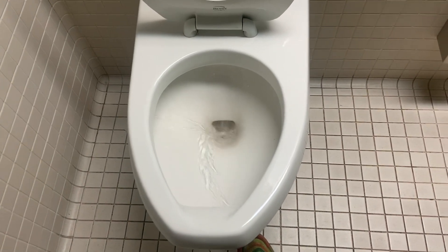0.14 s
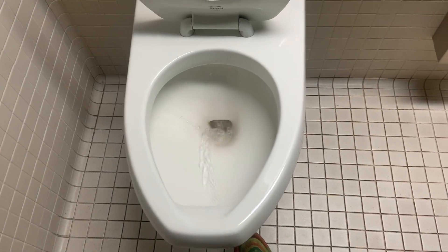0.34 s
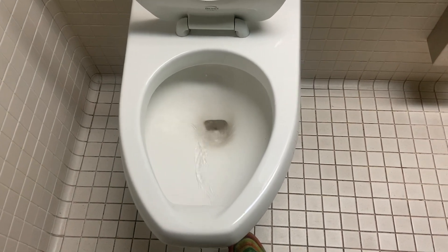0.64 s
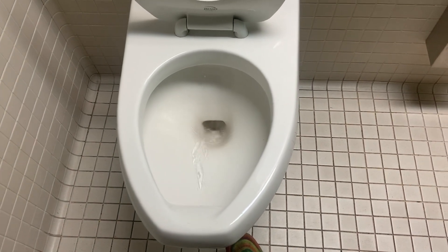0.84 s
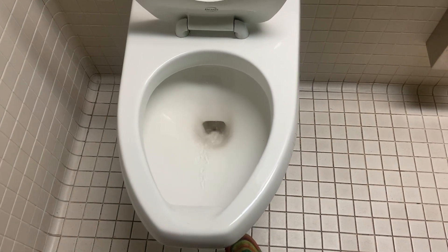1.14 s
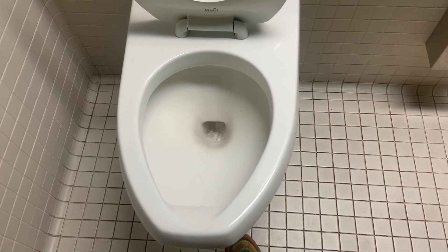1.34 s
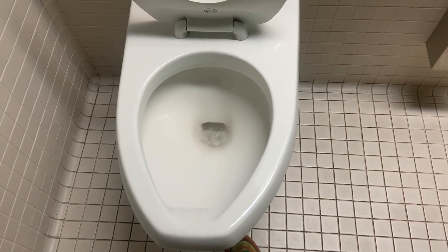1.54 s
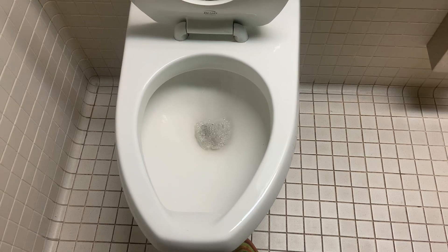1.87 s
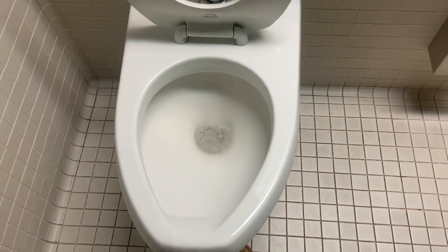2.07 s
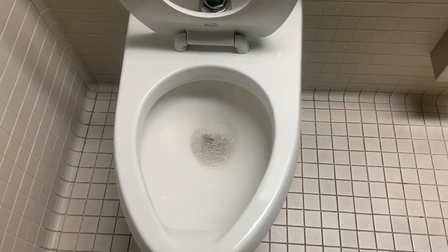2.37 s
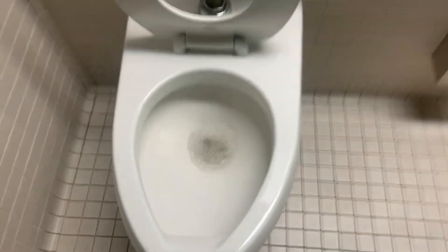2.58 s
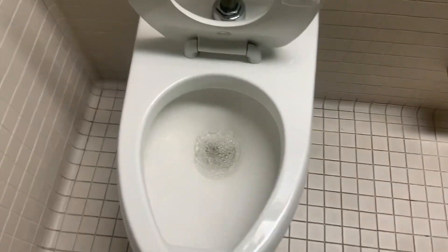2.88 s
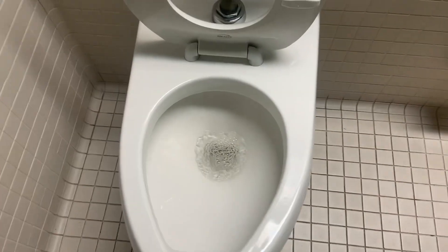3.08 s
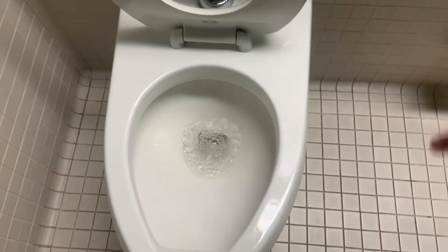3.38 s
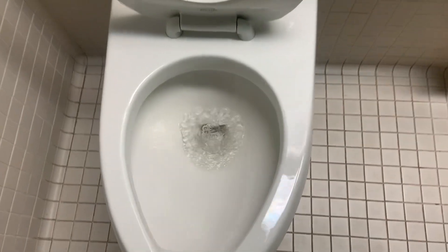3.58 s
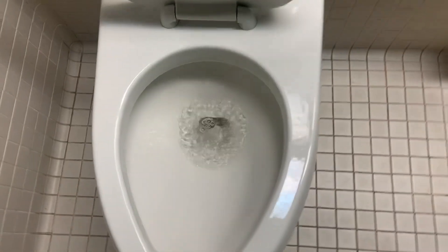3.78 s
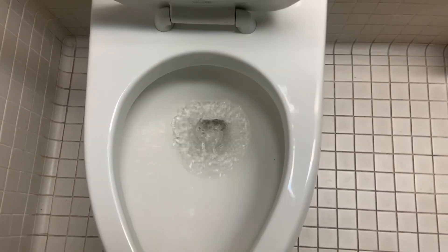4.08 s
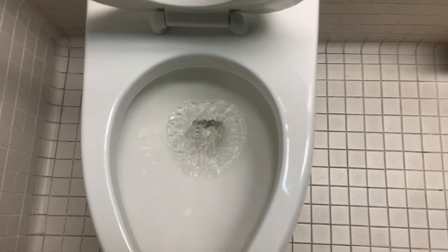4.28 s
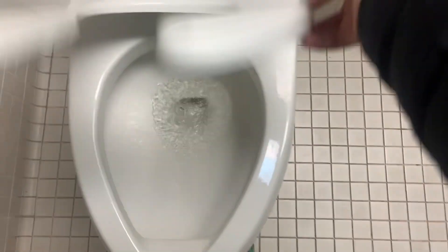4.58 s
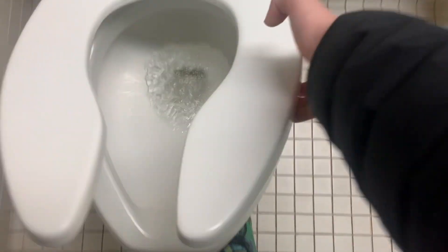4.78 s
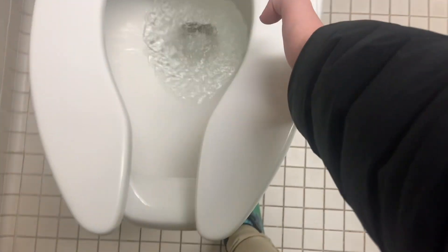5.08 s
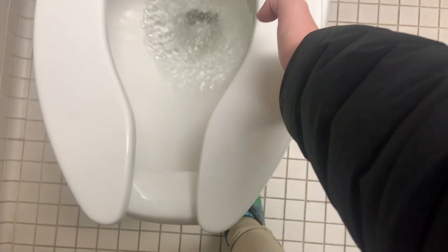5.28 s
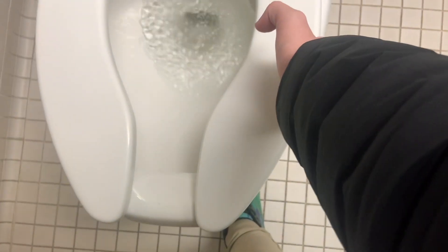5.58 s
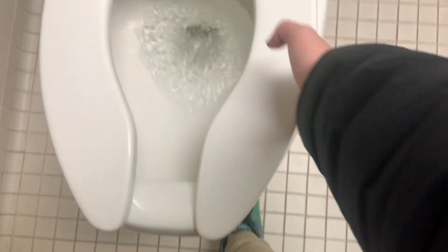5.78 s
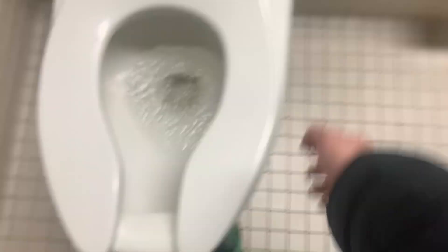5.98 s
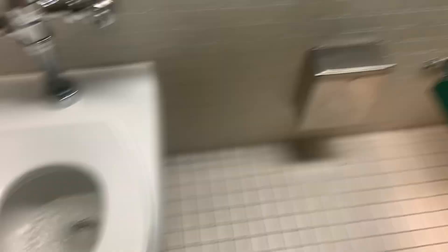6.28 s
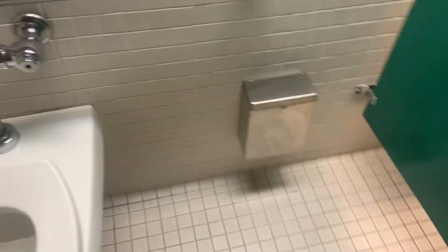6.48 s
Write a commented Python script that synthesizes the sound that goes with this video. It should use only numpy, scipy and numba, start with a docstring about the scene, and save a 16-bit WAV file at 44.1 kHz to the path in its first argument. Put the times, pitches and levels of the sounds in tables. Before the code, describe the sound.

A toilet flush rushes and gurgles in a tiled restroom, cuts off abruptly, then a heavy clattering thump rings out, followed by faint rumble and knocks.

```python
"""Tiled restroom, close to the toilet: noise through bowl resonances rushes and a moving band gurgles
until the flush is cut short. Bursts of noise tick as drips, then a heavy thump sets panel modes ringing.
The level of rumble, hum and faint hiss goes up and down; low thuds and knocks of the seat come
now and then, most of them near the end.
The microphone has two ports a few centimetres apart, out of step above the bass."""
import sys
import numpy as np
from scipy import signal
from scipy.fft import rfft, irfft
from scipy.io import wavfile
from scipy.ndimage import uniform_filter1d, minimum_filter1d
from numba import njit

SR = 44100
rng = np.random.default_rng(int(sys.argv[2]) if len(sys.argv) > 2 else 0)


def digitize_waveform(pressure):
    """Quantize a signal to 16-bit integers and store it at the path in sys.argv[1].

    Rows of a 2-D input are taken as channels; values are limited to [-1, 1].
    """
    field = np.atleast_2d(pressure).T
    bounded = np.clip(field, -1, 1)
    quanta = np.round(bounded * 32767).astype(np.int16)
    wavfile.write(sys.argv[1], SR, quanta)


N = 292383
T, HZ = np.arange(N) / SR, np.fft.rfftfreq(N, 1 / SR) + 1e-3
FLUSH_END_S, FLUSH_CUT_S = 1.368, 0.0032


# the flush as the flow dies: [t/s, spray level/dB, gurgle f/Hz, gurgle level/dB]
FLUSH_COURSE = [(0.0, -23.5, 397, -31.5), (0.16, -22.5, 360, -33.5), (0.28, -23.5, 390, -31),
                (0.4, -24, 403, -33), (0.49, -26.5, 339, -32), (0.56, -26, 360, -33.5),
                (0.63, -28, 302, -36.5), (0.71, -27, 356, -36.5), (0.77, -29, 290, -36.5),
                (0.88, -30.5, 303, -37), (1.0, -32.5, 310, -44), (1.2, -36.5, 320, -54),
                (1.37, -38.5, 347, -42.5)]


def flush():
    """Spray, bubbles and jet over the gurgling trap, slightly louder at the left port; all stop at once."""
    spray_db, gurgle_hz, gurgle_db = curves(FLUSH_COURSE)
    froth = undb(-14.0) * bubbles(rate_hz=220, lo_hz=595.7, hi_hz=7593, cycles=15)
    water = undb(spray_db) * (spray() + froth + jet())
    left_louder = undb([[.6], [-.6]])
    return running() * left_louder * (water + gurgle(gurgle_hz, gurgle_db))


# colour of the spray before the bowl: [f/Hz, relative level/dB per Hz]
SPRAY_COLOUR = [(40, -12.5), (80, 3), (120, 6), (200, 4.5), (600, -3.5), (1200, -10), (2600, 3.5),
                (3800, -4.5), (5500, -7), (8000, 0), (9100, -2.5), (10000, -14), (11000, -8.5),
                (12000, -14.5), (14300, -25), (15500, -41)]
# resonances of the bowl: [f/Hz, width/Hz, relative level/dB]
BOWL_PEAKS = [(720, 23, 6), (1036, 42, 5), (1345, 70, 4), (1708, 50, 2), (2080, 100, -3.5), (3640, 140, 0),
              (4710, 740, 3.5), (6300, 460, 0)]
# how alike the two ports hear the near spray: [f/Hz, shared power/0-1]
ALIKE_SPRAY = [(130, 1), (300, 0.14), (700, 0.7), (1500, 0.3), (2400, 0.65), (3200, 0.7), (4100, 0.4),
               (4900, 0.7), (7900, 0.7), (9000, 1), (12000, 1)]


def spray():
    """Falling water is broad noise, strengthened at the resonances of the bowl."""
    bowl_gain = np.hypot(1, 1.7 * resonances(BOWL_PEAKS))
    colour = undb(over_hz(SPRAY_COLOUR)) * bowl_gain
    return wide_noise(colour, flicker_db=2.0, rate=28, alike=ALIKE_SPRAY, ragged=0.45)


def jet():
    """A narrow jet whistles broadly: a noise band whose pitch and level wander."""
    centre_hz = 4700 * (1 + 0.14 * walk(5.7))
    whistle = moving_band(rng.standard_normal(N), centre_hz, 500.)
    return undb(-20.0 + 3.3 * walk(9.6)) * unit(ports(whistle))


# the trap gulps air and the gurgle changes level: [t/s, level/dB against the gurgle]
AIR_GULPS = [(0.285, 6.5), (0.472, 9), (0.63, 8), (0.77, 6.5), (1.35, -4.5)]
GULP_S = 0.027  # standard deviation of the bell-shaped gulp


def gurgle(hz, level_db):
    """Air in the trap gurgles: noise through two narrow bands that follow the given pitch."""
    gulp_db = sum(db * np.exp(-.5 * ((T - s) / GULP_S) ** 2) for s, db in AIR_GULPS)
    left, own = (moving_band(moving_band(n, hz, 92.0), hz, 95.0) for n in rng.standard_normal((2, N)))
    # the ports hear it unalike, partly in opposite phase
    at_ports = unit(np.array([left, own - 0.12 * left]))
    return undb(level_db + gulp_db + 0.51 * walk(15)) * at_ports


# the panel touches, lands and settles: [t/s, push level/dB, contact/ms]
PANEL_BLOWS = [(2.357, -42, 3.9), (2.373, -34, 2.7), (2.409, -25.5, 0.64), (2.535, -28, 5.4),
               (2.549, -20.5, 4.9), (2.563, -21.5, 3.5), (2.66, -32.5, 4.6)]
# ringing of the panel: [f/Hz, relative level/dB, t60/s]
PANEL_MODES = [(56.4, 2, 0.5), (70.8, 0, 0.31), (110.2, -3.5, 0.32), (147, -11, 0.47), (175.7, -1, 0.33),
               (242, -10.5, 0.32), (290.7, -11, 0.54), (343.6, -7.5, 0.82), (380, -10, 0.62),
               (456, -18, 0.29), (635, -14.5, 0.3), (800, -16.5, 0.25), (1010, -23.5, 0.84),
               (1930, 0, 0.45), (2140, -6, 0.83), (2500, 2.5, 0.7), (2923, -7, 0.28), (3346, -19.5, .3),
               (4900, -34.5, .3), (7000, -13.5, .3)]
# the panel comes to rest on its stop, which chokes the first ringing
CHOKE_S, CHOKE_DB, CHOKE_TAKES_S = 2.517, -9, .012


def thump():
    """Blows ring the panel; loose parts crash along and a thin metal part jangles on."""
    choke = undb(CHOKE_DB * ((T - CHOKE_S) / CHOKE_TAKES_S).clip(0, 1))
    landing = tiles(ring(pushes(PANEL_BLOWS[:3] + chatter()), PANEL_MODES), wet_db=-5) * choke
    settling = tiles(ring(pushes(PANEL_BLOWS[3:]), PANEL_MODES), wet_db=-7)
    dull = signal.butter(6, 8500, fs=SR, output="sos")
    return signal.sosfilt(dull, landing + settling + splash()) + crash() + jangle()


# times, first push level and contact of the chatter
CHATTER_S, CHATTER_DB, CHATTER_MS = 2.421, -14.5, 1.4
BOUNCE_S, BOUNCE_LOSS_DB, BOUNCES = .0175, 6, 6


def chatter():
    """On landing the panel chatters against its stop, weaker at each bounce."""
    return [(CHATTER_S + k * BOUNCE_S, CHATTER_DB - BOUNCE_LOSS_DB * k, CHATTER_MS) for k in range(BOUNCES)]


def since_landing():
    """Seconds since the panel landed, 0 before."""
    return np.clip(T - PANEL_BLOWS[2][0], 0, None)


# colour of the loose parts: [f/Hz, relative level/dB per Hz]
CRASH_COLOUR = [(60, -6), (300, 9.5), (700, -3.5), (1300, -16.5), (2200, -16), (3000, -18.5), (3450, -20.5),
                (4100, -27), (4800, -29), (5800, -37), (7000, -31.5), (8000, -40), (9500, -46.5),
                (12000, -61.5)]
CRASH_S = .085  # decay time constant


def crash():
    """The early blows and the chatter set loose parts crashing: noise that builds in ms and dies away."""
    t = T[:SR]
    swell = (1 - np.exp(-t / 0.0026)) * np.exp(-t / CRASH_S)
    envelope = signal.fftconvolve(pushes(PANEL_BLOWS[:4] + chatter()), swell)[:N]
    noise = wide_noise(undb(over_hz(CRASH_COLOUR)), flicker_db=1.0, rate=32, ragged=0.41)
    return undb(-9) * envelope * noise


# colour of the thin metal, squared where it is played: [f/Hz, width/Hz, level/dB before squaring]
JANGLE_PEAKS = [(1950, 180, -4), (2150, 220, -2), (2480, 300, -3), (2750, 200, -9)]
JANGLE_DB, JANGLE_S = -26.5, .14
CORE_DB, CORE_S = -34, .15


def jangle():
    """Thin metal jangles as narrow noise bands; the middle one outlasts its edges."""
    since = since_landing()
    # it already stirs at the first touch
    stir = undb(-21) * ((T - PANEL_BLOWS[0][0]) / 0.042).clip(0, 1) * np.exp(-since / .02)
    envelope = (1 - np.exp(-since / 0.0046)) * np.exp(-since / JANGLE_S) + stir
    metal = wide_noise(resonances(JANGLE_PEAKS) ** 2, flicker_db=3.5, rate=77, ragged=0.47) * envelope
    core = wide_noise(resonances([(2214, 42, 0)]) ** 2, flicker_db=-0.5, rate=40)
    core = core * (since > 0) * np.exp(-since / CORE_S)
    return undb(JANGLE_DB) * metal + undb(CORE_DB) * core


# colour of the bright burst: [f/Hz, width/Hz, relative level/dB]
SPLASH_PEAKS = [(3460, 460, -2), (4700, 490, -9), (6960, 320, -10.5)]
SPLASH_DB, SPLASH_S = -36, .07


def splash():
    """The landing itself bursts bright and short: noise with a quick rise and exponential decay."""
    since = since_landing()
    envelope = (since / 0.0028).clip(0, 1) * np.exp(-since / SPLASH_S)
    return wide_noise(resonances(SPLASH_PEAKS), flicker_db=0.5, rate=55) * undb(SPLASH_DB) * envelope


# knocks and nudges of the seat: [t/s, push level/dB, contact/ms]
SEAT_KNOCKS = [(2.042, -35, 9.5), (2.193, -47, 2.9), (2.203, -38.5, 7), (4.02, -24, 10), (4.458, -46, 1.5),
               (5.018, -47.5, 1.5), (5.619, -45.5, 0.11), (5.6225, -34.5, 0.29), (5.629, -30, 2.7),
               (5.778, -40.5, 0.34), (5.792, -36, 0.56), (5.812, -30, 5.5), (5.862, -24, 7.4),
               (5.877, -40.5, 8)]
# ringing of the seat: [f/Hz, relative level/dB, t60/s]
SEAT_MODES = [(67.8, -2, 0.045), (253, -6, 0.06), (575, -6, 0.024), (747, -4, 0.04), (1030, -5, 0.05),
              (1372, -2, 0.08), (1630, -5, 0.06), (1930, -6, 0.08), (2310, -1, 0.17), (2730, -4, 0.05),
              (3080, -1, 0.04), (3466, -9, 0.18), (3850, -4, 0.03), (5100, -14, .02), (5970, -16, 0.02)]


def seat():
    """Plastic knocks on porcelain and rings in short modes; it also scuffs."""
    return tiles(ring(pushes(SEAT_KNOCKS), SEAT_MODES), wet_db=-15) + scuff()


# the seat scuffs on the rim: [t/s, length/s, level/dB, fade/dB per s, attack/s]
RIM_SCUFFS = [(5.618, .015, -41, 250, .001), (5.621, .15, -47, 60, .004), (5.772, .095, -46.5, 15, .014)]
SCUFF_RELEASE_DB_PER_S = 800  # added to the fade after the length


def scuff():
    """Rubbing is rough noise, coloured by the seat modes above the lowest, broadened."""
    colour = resonances([(hz, 0.54 * hz, db) for hz, db, _ in SEAT_MODES[1:]]) / np.hypot(1, (HZ / 2300) ** 3)
    rub = np.zeros(N)
    for s, length, db, fade, attack in RIM_SCUFFS:
        since = T - s
        release_db = SCUFF_RELEASE_DB_PER_S * (since - length).clip(0)
        rub += undb(db - fade * since.clip(0) - release_db) * (since / attack).clip(0, 1)
    return rub * wide_noise(colour, flicker_db=3.0, rate=150, ragged=0.24)


# the clearest drips and ticks: [t/s, peak level/dB of the pitched part before the room, f/Hz]
CLEAR_TICKS = [(0.117, -16, 6250), (1.149, -24, 6900), (1.416, -35, 8600), (1.4576, -43, 11400),
               (1.5091, -48.5, 4580), (1.511, -30, 8600), (1.66, -46.5, 4810), (2.3406, -41, 8030),
               (2.745, -57, 5050), (2.807, -49, 5730), (2.676, -45, 5000), (2.854, -42.5, 4630),
               (2.98, -50, 7100), (3.0444, -51, 3920), (3.071, -42, 8000), (3.263, -47.5, 6300),
               (3.4204, -62, 6700), (3.7856, -55, 5330), (3.8707, -53, 4870), (3.9764, -56.5, 4330),
               (4.0057, -59, 4760), (4.2204, -63, 5070), (4.386, -61, 4970), (5.052, -50, 8450)]
TICK_S, TICK_WIDTH = 0.0017, 0.25  # decay time constant; bandwidth as a share of the pitch
TICK_CRACK_DB = -5.5  # broad crack under the pitch
PATTER_PER_S, PATTER_OVER_DB = 6, 6  # loudest patter above the treble level of the background


def ticks():
    """Drips are short bright bursts of noise; fainter random ones patter with the treble level."""
    out, t = np.zeros(N), T[:800]
    treble_db = curves(BACKGROUND_LEVELS)[1]
    draws = rng.random((int(PATTER_PER_S * N / SR), 3)) * [(N - len(t)) / SR, 1, 1]
    patter = [(s, treble_db[int(s * SR)] + PATTER_OVER_DB - 8 * size, 4000 * 2 ** pitch)
              for s, size, pitch in draws]
    for s, db, hz in CLEAR_TICKS + patter:
        burst = rng.standard_normal(len(t)) * np.exp(-t / TICK_S)
        tick = bright(burst, hz, TICK_WIDTH) + undb(TICK_CRACK_DB) * bright(burst, 4500, 2.8)
        out[int(s * SR):][:len(t)] += undb(db) * tick
    return tiles(out + swishes(), wet_db=-8.0)


# soft bright swishes: [t/s, length/s, peak level/dB before the room, f/Hz]
SOFT_SWISHES = [(3.42, .05, -51, 6260), (3.543, 0.13, -52.5, 5400), (4.357, 0.11, -66.5, 4940),
                (4.788, .16, -62.5, 5550)]


def swishes():
    """A swish is a noise band that swells and sinks smoothly."""
    out = np.zeros(N)
    for s, length, db, hz in SOFT_SWISHES:
        swell = np.hanning(int(length * SR))
        band = bright(rng.standard_normal(len(swell)) * swell, hz, width=0.43)
        out[int(s * SR):][:len(swell)] += undb(db) * band
    return out


# lone faint pings: [t/s, f/Hz, level/dB, t60/s]
FAINT_PINGS = [(3.201, 1090, -48, 0.14), (3.383, 1910, -56, 0.14), (3.5, 2510, -47, 0.089),
               (3.65, 2210, -55, 0.08), (3.88, 2120, -57, 0.12), (3.942, 2495, -50, 0.24),
               (3.942, 2440, -52, 0.1), (3.941, 2770, -51, 0.12), (4.0, 2116, -64, 0.28)]
# a small loose part rattles after the thump: [t/s, push level/dB]
RATTLE_HITS = [(2.895, -50), (3.04, -46), (3.06, -48), (3.124, -50), (3.15, -48), (3.199, -48), (3.28, -49),
               (3.312, -45), (3.33, -47), (3.415, -50), (3.52, -53), (3.55, -53), (3.575, -54)]
# ringing of the loose part: [f/Hz, relative level/dB, t60/s]
LOOSE_PART_MODES = [(1300, -9, 0.09), (1600, -3, 0.11), (1800, -10, 0.08), (2750, -8, 0.05)]
RATTLE_MS = 0.36  # contact


def pings_and_rattle():
    """Fading sine pings and a small part ringing at each hit, roughened by a fast level wobble."""
    tones = ring(pushes([(s, db, RATTLE_MS) for s, db in RATTLE_HITS]), LOOSE_PART_MODES)
    t = T[:SR // 2]
    for s, hz, db, t60 in FAINT_PINGS:
        envelope = (t / 0.0052).clip(0, 1) * 1000. ** (-t / t60)
        tones[int(s * SR):][:len(t)] += undb(db) * np.sin(2 * np.pi * hz * t) * envelope
    return tiles(tones * undb(1.05 * walk(96)), wet_db=-16)


# background level as heard, rising and falling: [t/s, bass reference level/dB, treble reference level/dB]
BACKGROUND_LEVELS = [(1.38, -57, -50.5), (1.46, -68.5, -66.5), (1.6, -59.5, -61.5), (1.75, -68, -69),
                     (1.85, -72.5, -77), (2.33, -74.5, -77), (2.75, -41, -53.5), (3.0, -45, -57),
                     (3.42, -49, -59.5), (3.68, -66, -66), (3.82, -58, -63), (4.1, -60, -70),
                     (4.42, -57.5, -69.5), (4.5, -51.5, -69), (4.85, -59.5, -70.5), (5.04, -61, -73.5),
                     (5.12, -68, -79), (5.6, -64.5, -78.5), (5.76, -52, -73), (5.83, -46, -84),
                     (5.89, -56.5, -65.5), (5.96, -65, -64.5), (6.08, -55, -57.5), (6.18, -49, -58),
                     (6.5, -49.5, -60), (6.63, -52, -64.5)]


def background():
    """Draining bowl, hum, drone, rumble, bubbly hiss and a thin top band, at the background levels."""
    bass_db, treble_db = curves(BACKGROUND_LEVELS)
    return drain() + hum(bass_db) + drone(bass_db) + rumble(bass_db) + hiss(treble_db) + sizzle(treble_db)


# the bowl as the last water drains: [f/Hz, width/Hz, relative level/dB]
DRAIN_PEAKS = [(320, 40, -1.5), (600, 80, -4), (990, 43, 2.5), (1380, 78, -5.5), (2000, 260, -17.5)]
DRAIN_DB, DRAIN_FADE_DB_PER_S = -54, 38


def drain():
    """The bowl murmurs after the flush: resonant noise that flickers and fades."""
    fade_db = DRAIN_FADE_DB_PER_S * (T - FLUSH_END_S).clip(0)
    murmur = wide_noise(resonances(DRAIN_PEAKS), flicker_db=7.0, rate=71)
    return murmur * undb(DRAIN_DB - fade_db) * (1 - running())


HUM_HZ, HUM_OVER_DB, HUM_IN_FLUSH_DB = 56.4, 6, -43  # above the bass level; while the water runs


def hum(bass_db):
    """A low sine wavers in pitch and level."""
    gain = undb(bass_db + HUM_OVER_DB) * (1 - running()) + undb(HUM_IN_FLUSH_DB) * running()
    phase = 2 * np.pi * np.cumsum(HUM_HZ + 7.1 * walk(18)) / SR
    return np.sqrt(2) * np.sin(phase) * gain * undb(1.1 * walk(24))


DRONE_HZ, DRONE_START_S, DRONE_END_S = 309.4, 2.75, 4.54
DRONE_OVER_DB, DRONE_FADE_DB_PER_S = -4.5, -4  # above the bass at its start; negative: gains on the bass


def drone(bass_db):
    """A hollow drone: noise through two narrow bands at a wandering pitch, faded out at its end."""
    hz = DRONE_HZ + 12 * walk(10)
    level_db = bass_db + DRONE_OVER_DB - DRONE_FADE_DB_PER_S * (T - DRONE_START_S) + 3.5 * walk(14)
    tone = unit(moving_band(moving_band(rng.standard_normal(N), hz, 31.0), hz, 49.0))
    gate = (T > DRONE_START_S) * ((DRONE_END_S - T) / 0.54).clip(0, 1)
    return tone * undb(level_db) * gate


# low resonances of the room: [f/Hz, width/Hz, relative level/dB]
RUMBLE_PEAKS = [(82, 25, 7.5), (143, 6.6, 10.5), (183, 30, -4), (237, 48, -4), (313, 56, -8),
                (385, 26, -5.5), (500.6, 48, -8.5), (690, 80, -13.5)]


def rumble(bass_db):
    """Noise rumbles in the low room resonances."""
    colour = resonances(RUMBLE_PEAKS) / np.hypot(1, (HZ / 1200) ** 2)
    return wide_noise(colour, flicker_db=2.5, rate=18) * undb(bass_db + 2.0)


# colour of the hiss: [f/Hz, relative level/dB per Hz]
HISS_COLOUR = [(500, 5.5), (1000, 0.5), (1500, -2), (2500, -1), (3500, -3), (5000, -5.5), (7000, -10),
               (7900, -15), (8200, -38.5)]


def hiss(treble_db):
    """Faint broad noise with a trickle of small bubbles in it."""
    noise = wide_noise(undb(over_hz(HISS_COLOUR)) * (HZ > 450), flicker_db=2, rate=25, ragged=0.3)
    trickle = undb(-9.0) * bubbles(rate_hz=100, lo_hz=895, hi_hz=7070, cycles=7.9)
    return undb(treble_db) * (noise + trickle)


# colour of the thin top band: [f/Hz, relative level/dB per Hz]
SIZZLE_TINT = [(7700, -48), (8100, -0.5), (9000, 5), (10000, -10.5), (11500, -13.5), (14000, -18.5),
               (15500, -40)]
# it flares up: [t/s, starting level/dB]
SIZZLE_FLARES = [(1.369, -52), (2.347, -56), (5.931, -74)]
SIZZLE_FLOOR_DB, SIZZLE_OVER_DB, FLARE_FADE_DB_PER_S = -86, -15.5, 44.5  # OVER: above the treble level


def sizzle(treble_db):
    """Top treble noise over a steady floor, with sudden flares that fade."""
    flares = sum(undb(db - FLARE_FADE_DB_PER_S * (T - s).clip(0)) * (T > s) for s, db in SIZZLE_FLARES)
    gain = undb(SIZZLE_FLOOR_DB) + undb(treble_db + SIZZLE_OVER_DB) + flares
    return wide_noise(undb(over_hz(SIZZLE_TINT)), flicker_db=2.5, rate=27) * gain


def running():
    """1 while the water runs, then quickly 0."""
    return np.clip((FLUSH_END_S - T) / FLUSH_CUT_S, 0, 1)


def bubbles(rate_hz, lo_hz, hi_hz, cycles):
    """Bubbles are dense short steady tones of random pitch and size, scaled together to rms 1."""
    out, t = np.zeros(N + 2048), T[:2048]
    for when, pitch, size in rng.random((int(rate_hz * N / SR), 3)):
        hz = lo_hz * (hi_hz / lo_hz) ** pitch
        envelope = hz * t * np.exp(-hz * t / cycles)
        out[int(when * N):][:len(t)] += np.sin(2 * np.pi * hz * t) * envelope * undb(8 * size)
    return unit(ports(out[:N]))


def pushes(table):
    """Raised-cosine pushes, area 1 before their level; a longer contact is duller."""
    force = np.zeros(N)
    for s, db, ms in table:
        push = np.hanning(int(ms * SR / 1000) + 3)
        force[int(s * SR):][:len(push)] += undb(db) * push / push.sum()
    return force


def ring(force, modes):
    """A force sets decaying sine modes ringing: [f/Hz, level/dB, t60/s]."""
    t = T[:SR]
    body = sum(undb(db) * np.sin(2 * np.pi * hz * t) * 1000. ** (-t / t60) for hz, db, t60 in modes)
    return signal.fftconvolve(force, body)[:N]


ROOM_T60_S, ROOM_TREBLE_HZ = 0.55, 3500


def tiles(x, wet_db):
    """Direct sound plus the tail of a hard room, duller as it dies, its own at each port."""
    t, noise = T[:SR], rng.standard_normal((2, SR))
    low = signal.sosfilt(signal.butter(2, ROOM_TREBLE_HZ, fs=SR, output="sos"), noise)
    treble_tail = (noise - low) * 1000. ** (-t / (0.11 * ROOM_T60_S))
    tail = low * 1000. ** (-t / ROOM_T60_S) + treble_tail
    wet = signal.fftconvolve(x[None], tail / np.linalg.norm(tail[0]), axes=1)[:, :N]
    return ports(x) + undb(wet_db) * wet


# how far the left port lags the right: [f/Hz, phase/radians]
PORT_LAG = [(100, 0), (700, .7), (1800, .6), (2400, 2.3), (2900, 3.14), (3400, 3.6), (4100, 4.7),
            (4800, 6.1), (6800, 5.8), (7900, 4.5), (8600, 3.8), (9100, 3.14), (10700, 3.14), (12000, .2),
            (13000, 0)]


def ports(x):
    """One sound at both microphone ports, the left one shifted in phase."""
    return np.array([irfft(rfft(x) * np.exp(-1j * over_hz(PORT_LAG)), N), x])


# how alike the two ports hear the spread-out room: [f/Hz, shared power/0-1]
ALIKE_SPREAD = [(100, 1), (1000, 0.6), (2000, 0.3), (5000, 0.25), (6800, 0.8), (7900, 0.7), (9000, 1),
                (12000, 1)]


def wide_noise(gain, flicker_db, rate, alike=ALIKE_SPREAD, ragged=0.72):
    """Noise in octave bands that flicker alone; partly shared by the ports, partly their own; rms 1."""
    share = np.clip(over_hz(alike), 0, 1)
    both, own = rfft(ports(rng.standard_normal(N))), rfft(rng.standard_normal((2, N)))
    spectrum = gain * ripple(ragged) * (np.sqrt(share) * both + np.sqrt(1 - share) * own)
    octave = np.log2(np.clip(HZ, 125, 8000) / 125)
    bands = (irfft(spectrum * np.clip(1 - abs(octave - k), 0, 1), N) for k in range(7))
    return unit(sum(band * undb(flicker_db * walk(rate)) for band in bands))


RIPPLE_S = 0.0052  # decay time constant of the echoes


def ripple(depth):
    """The many close resonances of a small hard room make a spectrum ragged."""
    echoes = rng.standard_normal(SR // 4) * np.exp(-T[:SR // 4] / RIPPLE_S)
    return unit(abs(rfft(echoes, N)) ** depth)


def bright(burst, hz, width):
    """A burst of noise narrowed twice to a band, peak 1; width is a share of the pitch."""
    for _ in range(2):
        burst = moving_band(burst, np.full(len(burst), 1. * hz), width * hz)
    return burst / abs(burst).max()


@njit
def moving_band(x, hz, width):
    """State-variable band-pass whose centre can move every sample."""
    y, band, low = np.empty(len(x)), 0., 0.
    for i in range(len(x)):
        g, k = np.tan(np.pi * hz[i] / SR), width / hz[i]
        v = (band + g * (x[i] - low)) / (1 + g * (g + k))
        band, low, y[i] = 2 * v - band, low + 2 * g * v, k * v
    return y


def resonances(table):
    """Gain of resonant peaks added in power: [f/Hz, width/Hz, level/dB]."""
    return np.sqrt(sum(undb(db) ** 2 / (1 + ((HZ - hz ** 2 / HZ) / width) ** 2) for hz, width, db in table))


def walk(rate):
    """Random levels drawn rate times a second, smoothed twice, rms 1."""
    k = int(SR / rate)
    steps = np.repeat(rng.standard_normal(N // k + 1), k)
    return unit(uniform_filter1d(uniform_filter1d(steps, k), k)[:N])


def curves(table):
    """Columns of [t/s, value, ..] rows, interpolated at every sample."""
    s, *columns = np.transpose(table)
    return [np.interp(T, s, c) for c in columns]


def over_hz(table):
    """A [f/Hz, value] table at every frequency bin, interpolated over log frequency."""
    hz, value = np.transpose(table)
    return np.interp(np.log(HZ), np.log(hz), value)


def undb(db):
    """Decibels to gain."""
    return 10 ** (np.asarray(db) / 20)


def unit(x):
    """Scale to rms 1."""
    return x / np.sqrt(np.mean(x ** 2))


MONO_BELOW_HZ, MONO_ABOVE_HZ = 880, 11800
SIDE_ONLY_HZ = 9150, 10850  # in this band only the left-right difference is heard


def scene():
    """All but the flush share their bass left and right; one treble band loses its shared part, the top is mono."""
    opposite = np.array([[1], [-1]])
    left, right = background() + ticks() + pings_and_rattle() + thump() + seat()
    side = irfft(rfft(left - right) / (1 + (MONO_BELOW_HZ / HZ) ** 12), N) / 2
    left, right = flush() + (left + right) / 2 + side * opposite
    side = irfft(rfft(left - right) / (1 + (HZ / MONO_ABOVE_HZ) ** 60), N) / 2
    shared = 1 / (1 + (HZ / SIDE_ONLY_HZ[0]) ** 120) + 1 / (1 + (SIDE_ONLY_HZ[1] / HZ) ** 120)
    return irfft(rfft(left + right) * shared, N) / 2 + side * opposite


LOW_HZ, TOP_HZ = 44, 15400
LIMIT_DB, LIMIT_S = -6.5, .012


def record(dry):
    """The phone drops the deepest bass, turns down ahead of the loudest peaks and cuts the top."""
    thin = signal.sosfilt(signal.butter(4, LOW_HZ, "high", fs=SR, output="sos"), dry)
    span = int(LIMIT_S * SR)
    limit_gain = undb(LIMIT_DB) / np.maximum(abs(thin).max(axis=0), undb(LIMIT_DB))
    # hold the lowest gain around each peak, then smooth it
    held = thin * uniform_filter1d(minimum_filter1d(limit_gain, span), span)
    return signal.sosfilt(signal.ellip(8, .2, 70, TOP_HZ, fs=SR, output="sos"), held)


dry = scene()
out = record(dry)
digitize_waveform(out)
```